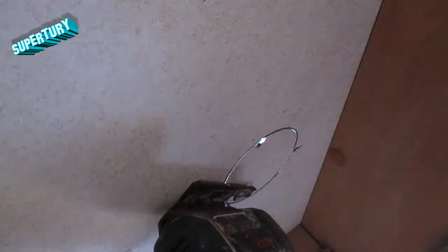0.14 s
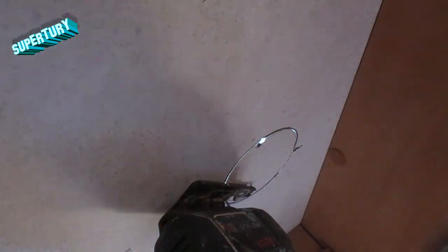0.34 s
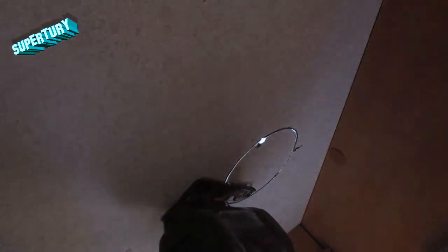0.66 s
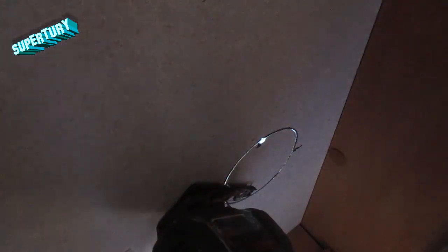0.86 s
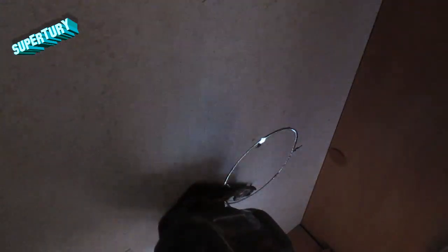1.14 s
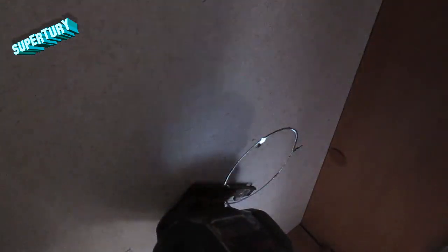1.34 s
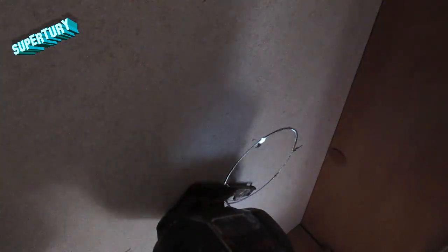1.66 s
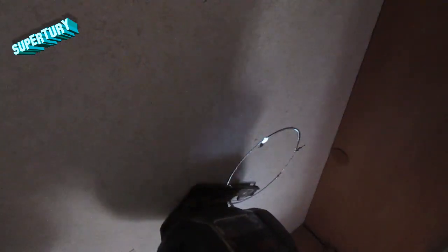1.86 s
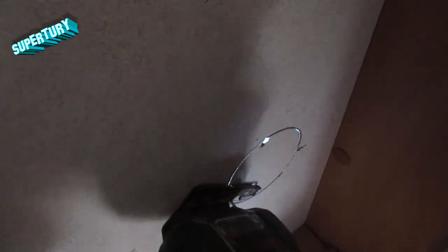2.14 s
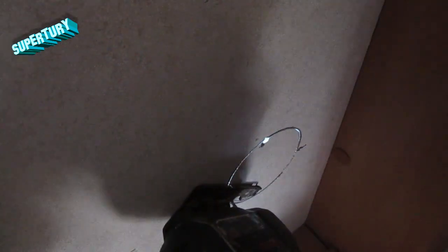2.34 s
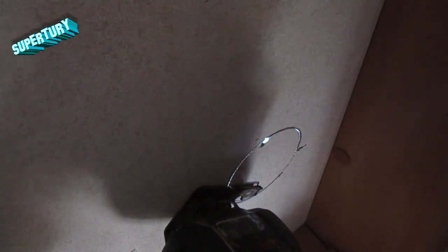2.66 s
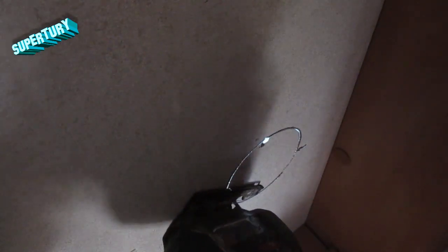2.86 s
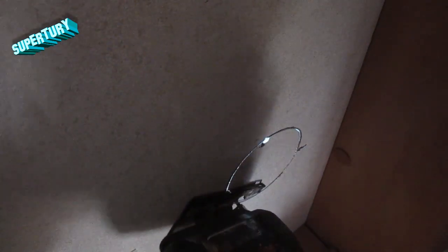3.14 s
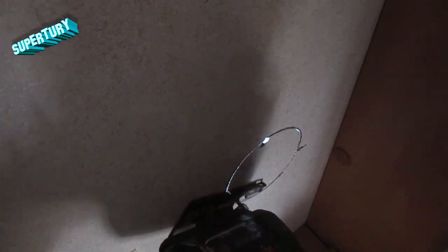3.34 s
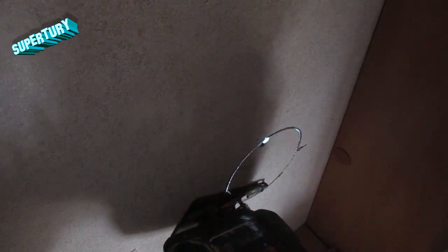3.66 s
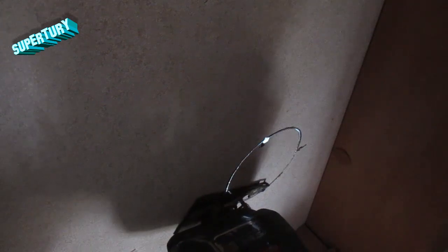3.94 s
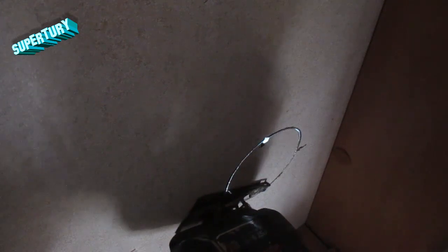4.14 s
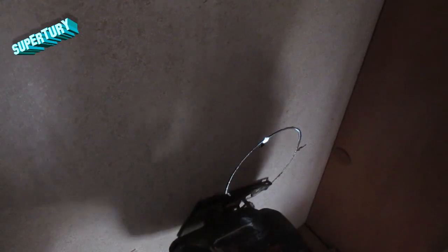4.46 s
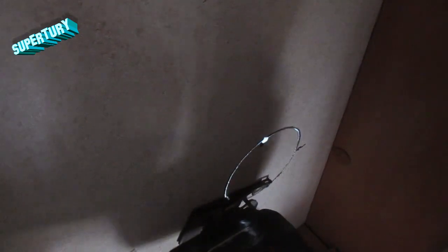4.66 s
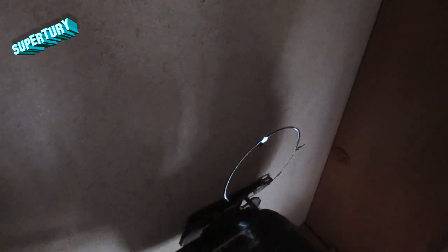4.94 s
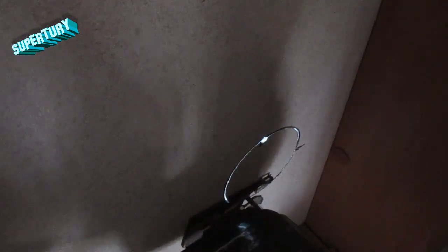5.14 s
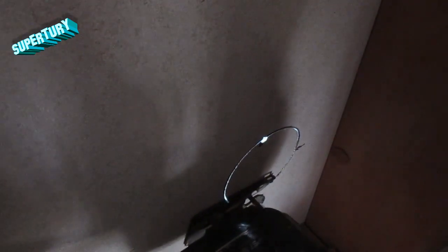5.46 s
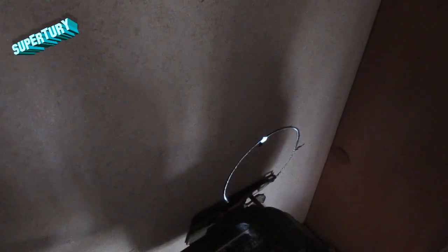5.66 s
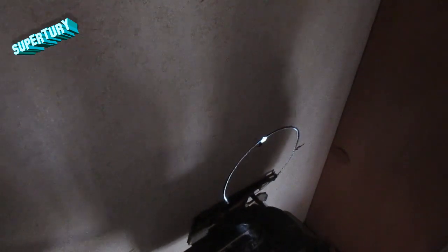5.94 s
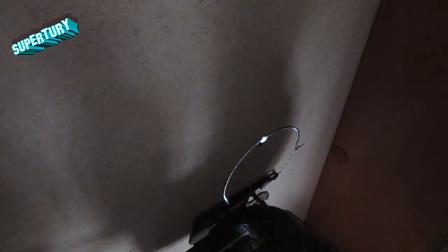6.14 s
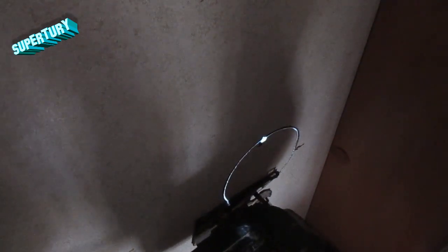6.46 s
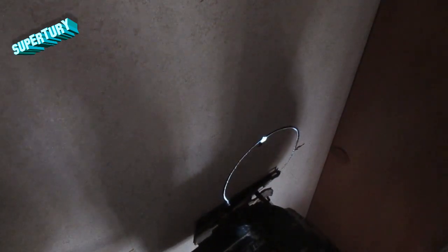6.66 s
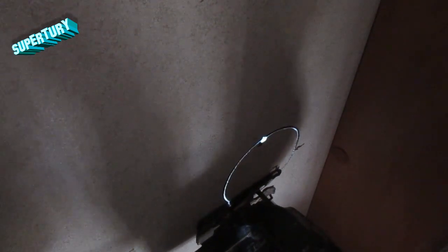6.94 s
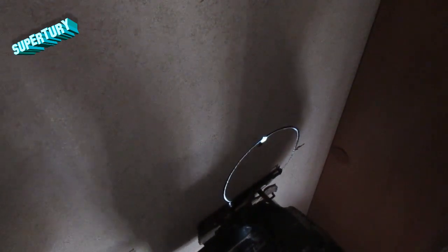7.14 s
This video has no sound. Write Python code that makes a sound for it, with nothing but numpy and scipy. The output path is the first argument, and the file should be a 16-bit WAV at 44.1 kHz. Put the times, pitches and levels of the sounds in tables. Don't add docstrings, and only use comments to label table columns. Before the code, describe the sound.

Close up in a small room, a handheld microphone catches a hand preparing a drill. At 0-0.15 s there is a short creak, a hollow drag of the saw cup and low bumps. Soft skin and cloth rubbing and dull thumps continue, growing around 0.9-1.1 s, with light knocks on the panel from 1 s. Hard clunks and scuffs crowd together at 1.6-1.72 s. At about 1.74 s the trigger is pulled: the saw catches with a heavy, lurching, overloaded growl and climbs in pitch until about 2.7 s. Gear chatter and whine come in, with brief squeals around 2.3-2.8 s. From 3 s the speed holds nearly steady: a loud buzzing drone, rasping teeth and thin steel ringing, pressure wavering, squeals near 3.4, 4.9, 5.2 and 6 s. The tone shifts subtly as the saw sinks, still running at 7.3 s.

```python
import sys
import numpy as np
from scipy import signal
from scipy.fft import rfft, irfft, next_fast_len
from scipy.io import wavfile
from scipy.ndimage import uniform_filter1d, map_coordinates

SR = 44100
rng = np.random.default_rng(int(sys.argv[2]) if len(sys.argv) > 2 else 0)


def how_loud(loudness_db):
    steps = np.asarray(loudness_db, float) / 20
    return 10 ** steps


def put_to_file(sound):
    columns = np.atleast_2d(sound).T
    safe = np.clip(columns, -1, 1)
    whole_steps = np.round(safe * 32767)
    wavfile.write(sys.argv[1], SR, whole_steps.astype(np.int16))


N = 321930
T = np.arange(N) / SR

# time_s, speed_turns_per_s
SHAFT_SPEED = [(1.8, 30.3), (1.89, 33.9), (1.97, 37.0), (2.11, 40.5), (2.32, 44.1), (2.46, 45.2),
               (2.69, 46.6), (2.87, 46.9), (3.36, 46.2), (3.74, 47.1), (4.48, 47.2), (4.73, 46.0),
               (4.95, 45.8), (5.28, 46.1), (5.8, 47.3), (6.49, 47.2), (6.82, 46.7), (7.3, 46.8)]
# time_s, depth_share (0 to 1)
DEPTH = [
    (1.8, 0.03),
    (2.5, 0.13),
    (3.5, .3),
    (4.5, 0.55),
    (5.3, .55),
    (5.7, 0.73),
    (6.6, .9),
    (7.3, 1),
]
# order, surface_db, half_way_db, full_depth_db, gain_db per turn a second of sag
STRONG_ORDERS = [(1, -48.5, -35, -53, -1.5), (2, -24.5, -20, -25.5, -1), (3, -17, -16.5, -18, -0.56),
                 (4, -32, -28.5, -29, -4.5), (5, -21, -14, -10, -1.49), (6, -28, -25, -32, 2),
                 (7, -16, -25, -27, 5), (8, -26, -35, -36.5, 0.1), (9, -41, -52, -52, -5),
                 (10, -29.5, -28, -32.5, -3.5)]
SLOW_DB = [-1.5, -5.5, 2, 7.5, -8, -7, -13, 1, 7, 5.5]
# order, level_db
WEAK_ORDERS = [(11, -32.5), (12, -39), (13, -38), (14, -35.5), (15, -44), (16, -42.5), (22, -42), (27, -40),
               (39, -56.5)]
# time_s, level_db
GEAR_LOAD = [(1.9, -48), (2.15, -36.5), (2.25, -25), (2.5, -24.5), (2.82, -21.5), (3.0, -32.5),
             (3.3, -27.5), (3.45, -23), (4.0, -23), (4.3, -27), (4.62, -31.5), (4.72, -25), (5.3, -23.5),
             (5.72, -23), (5.85, -27), (6.25, -26.5), (6.55, -25), (7.3, -25)]
# peak_s, gain_db, fall_s for 10 dB (the sign is ignored)
SQUEALS = [(2.28, 15, 0.04), (2.41, 16, 0.006), (2.75, 9, -0.03), (3.36, 8.5, -0.17), (3.52, 7, 0.02),
           (4.87, 6.5, 0.16), (5.2, 11, 0.13), (5.36, 7.5, 0.11), (5.5, 4, .05), (5.66, 1, .04),
           (5.98, 8, 0.09)]
# mode_hz, width_hz, level_db over the load, shift_hz at full depth
RING_MODES = [
    (4051, 500, -15, -100),
    (5990, 600, -6.5, -300),
    (8300, 900, -16.5, 0),
]
# time_s, level_db
PRESSURE = [(1.75, -35.5), (1.77, -37.5), (1.9, -30.5), (2.35, -26), (2.38, -22.5), (3.21, -28.5),
            (3.34, -25.5), (4.22, -25), (4.67, -28.5), (5.55, -23.5), (5.83, -26), (5.91, -22.5),
            (6.12, -27.5), (6.26, -23.5), (6.42, -26), (6.94, -24.5), (7.07, -27.5), (7.3, -28.5)]
# frequency_hz, density_db per Hz
GROWL = [(88, -58), (150, -12), (184, -6.5), (237, -12), (374, -12), (488, 0.5), (1900, 0.5), (2470, -80),
         (4180, -120)]
RASP = [(1300, -43), (1800, -1.5), (3200, -2.5), (5000, -3.5), (6500, -8), (8000, -22.5)]
HISS = [(3820, -19.5), (6500, -1), (10300, -10.5), (13600, -25), (15500, -34.5)]
# mode_hz, width_hz, level_db
BOOM = (505, 30, -35.5)
# start_s, peak_db, t60_s
KNOCKS = [(1.013, -20.5, 0.0615), (1.078, -24, 0.119), (1.178, -25.5, 0.087), (1.234, -27, 0.103),
          (1.251, -34, 0.074), (1.342, -34, 0.112), (1.419, -30, 0.149), (1.5, -35, 0.1),
          (1.545, -38.5, 0.16), (1.564, -28.5, 0.074), (1.609, -37, 0.1), (1.631, -12, 0.06),
          (1.677, -16.5, 0.064), (1.713, -15, 0.096)]
# mode_hz, width_hz, level_db
PANEL_MODES = [(288.3, 50, -3), (631, 87.5, 4), (1093, 385, -3), (1467, 148, -3), (2410, 1740, -15)]
CUP_MODES = [(320, 124, 5.5), (1287, 143, 3.5), (2480, 190, -6), (3950, 193, -14.5), (4860, 400, -17.5),
             (6240, 200, -18), (7410, 260, -19)]
# centre_s, peak_db, swing_hz, width_s
BUMPS = [(.056, -23.5, 90, 0.0108), (0.083, -21, 96.6, 0.0124), (.12, -29, 75, 0.057),
         (.3, -24.5, 64.5, 0.0376), (.462, -28.5, 70, .015), (0.498, -30.5, 65.5, .03),
         (.606, -22.5, 85, 0.0069), (.635, -25.5, 70, 0.0104), (0.729, -30, 75, 0.023),
         (.817, -20, 80, 0.013), (0.902, -16, 73.4, 0.031), (1.012, -15.5, 80, 0.0166),
         (1.093, -11.5, 75.7, 0.0293), (1.18, -31.5, 94, 0.017), (1.265, -27.5, 110, 0.0108),
         (1.367, -28, 93, 0.0264), (1.428, -28, 101, 0.015), (1.55, -26.5, 75, 0.0336),
         (1.616, -5.5, 98, 0.0107), (1.638, 4, 99.5, 0.01185), (1.674, -4, 106, 0.009),
         (1.721, 1.5, 85, 0.0176)]
# peak_s, middle_db, brightness_db per band, fall_s for 10 dB
STROKES = [(.06, -57, -9, 0.16), (.33, -52.5, -4, .08), (.45, -46.5, -1.5, 0.0367), (.562, -46, 10, .02),
           (.595, -43, 10, .03), (.7, -52, -7, 0.14), (.836, -49.5, -8.5, 0.0741), (.94, -44, -1, 0.0755),
           (1.07, -44.5, -6, 0.0982), (1.19, -46.5, -4, 0.0031), (1.255, -44.5, -10.5, 0.0177),
           (1.35, -51.5, -3, 0.0672), (1.43, -45.5, -12, 0.02), (1.565, -46.5, -4, 0.02),
           (1.621, -34, -5.5, 0.0077), (1.646, -25.5, -12.5, 0.021), (1.688, -20.5, -3.5, 0.0119),
           (1.718, -16.5, -4.5, 0.0191)]
# frequency_hz, level_db
SKIN_LOW = [(110, 1), (220, 2.5), (450, -1.5), (650, -20)]
SKIN_MIDDLE = [(400, -8), (550, -1.5), (1300, -9.5), (2100, -16), (2800, -17)]
SKIN_HIGH = [(1000, -26.5), (2100, -1), (5000, -3.5), (9000, -8), (15000, -23)]
# peak_s, level_db, pitch_hz, glide_hz_per_s, fall_s for 10 dB
CREAK = (.032, -38, 350, -5500, .02)
# time_s, level_db
TREMBLE_LEVEL = [(0.0, -46.5), (0.14, -47), (0.5, -37.5), (0.73, -42), (1, -36.5), (1.2, -44.5),
                 (1.49, -45), (1.6, -38.5)]
# frequency_hz, level_db
TREMBLE = [(20, -29.5), (40, 0), (70, -9), (110, -9.5), (200, -31.5)]

START_S = 1.74
FREE_TURNS, MOST_SAG = 47.3, 1.21


def unit(x):
    return x / np.sqrt(np.mean(x ** 2) + 1e-20)


def curves(rows, before=-120):
    time_s, *columns = np.transpose(rows)
    return [np.interp(T, time_s, column, before, column[-1]) for column in columns]


def depth_curve():
    return curves(DEPTH, before=None)[0]


def wobble(rate):
    return map_coordinates(rng.standard_normal(int(N * rate / SR) + 4), [T * rate])


def filtered(x, response):
    m = next_fast_len(N + SR)
    return irfft(rfft(x, m) * response(np.fft.rfftfreq(m, 1 / SR) + 1e-3), m)[:N]


def coloured(x, points):
    hz, db = np.transpose([(points[0][0] / 2, -120), *points, (points[-1][0] * 2, -120)])
    return unit(filtered(x, lambda f: how_loud(np.interp(np.log(f), np.log(hz), db))))


def resonances(modes):
    def response(f):
        return sum((-1) ** k * how_loud(db) * 1j * f * width / (centre ** 2 - f ** 2 + 1j * f * width)
                   for k, (centre, width, db) in enumerate(modes))
    return response


def peak(s, rise_s, fall_s):
    return -10 * np.where(T < s, (s - T) / abs(rise_s), (T - s) / abs(fall_s))


def since_start(fade_s):
    return np.exp(-np.maximum(T - START_S, 0) / abs(fade_s))


def shaft(turns):
    lurch_db = 9 * since_start(0.205)
    drive_db = 1.283 + lurch_db + peak(START_S, 0.0055, np.inf)
    depth = depth_curve()
    sag = np.clip(FREE_TURNS - np.gradient(turns) * SR, 0, MOST_SAG)
    running = np.clip((T - 2) / 1.0, 0, 1)

    levels = {}
    for (order, *depth_db, sag_gain), slow_db in zip(STRONG_ORDERS, SLOW_DB):
        sunk_db = np.interp(depth, [0, .5, 1], depth_db)
        levels[round(order)] = sunk_db + sag_gain * sag * running + slow_db * since_start(0.283) + drive_db
    for order, db in WEAK_ORDERS:
        levels[order] = db - 2.2 * sag + 1.41 * wobble(1.437) + 20 * np.log10(running + 1e-6)

    lag = wobble(1.22)
    shaking = np.zeros(N)
    for order, db in levels.items():
        drift = 0.0828 * order * lag + 0.0214 * order * wobble(1.097) + 0.07 * np.sqrt(order) * wobble(30)
        drift = drift + np.pi * (order in (6, 9, 13, 15))
        flutter_db = 0.331 * wobble(14) + 0.674 * wobble(4)
        shaking -= np.sqrt(2) * how_loud(db + flutter_db) * np.cos(2 * np.pi * order * turns + drift)
    return shaking


def gears(turns):
    centre_hz = 2066.5 + 128.7 * depth_curve() ** 3 + 15 * wobble(5)
    level_db = curves(GEAR_LOAD)[0] + 2 * wobble(12)
    speed = np.maximum(np.gradient(turns) * SR, 1)
    mesh = 0
    for order in range(35, 53, 2):
        near = 1 / np.sqrt(1 + ((order * speed - centre_hz) / 75) ** 4)
        drift = 1.0 * wobble(1.4745) + .5 * wobble(35) + 0.392 * wobble(200)
        mesh += near * how_loud(1.02 * wobble(3.064)) * np.cos(2 * np.pi * order * turns + drift)
    mesh *= 1 + 0.387 * np.cos(2 * np.pi * turns + 2.96 * wobble(0.962))
    envelope = np.sqrt(np.abs(uniform_filter1d(mesh ** 2, size=4410)) + 1e-6)
    even_mesh = mesh / envelope

    squeal = 1 + sum(how_loud(db + peak(s, fall_s, fall_s)) for s, db, fall_s in SQUEALS)
    overtone = unit(filtered(even_mesh ** 2, lambda f: f > 3000))
    return how_loud(level_db - 0.1) * (even_mesh + how_loud(-14.5) * squeal * overtone)


def ring(turns):
    struck = how_loud(1 * np.cos(4 * np.pi * turns - 2.2))
    loads = curves(GEAR_LOAD) + 2 * curves(PRESSURE)
    depth = depth_curve()
    running = np.clip((T - 1.9) / 0.55, 0, 1)
    ringing = np.zeros(N)
    for load_db, (hz, width_hz, db, shift_hz) in zip(loads, RING_MODES):
        pitch_hz = (hz + shift_hz * depth) * (1 + .012 * wobble(3))
        swell = how_loud(1.82 * wobble(40) + 1.7 * wobble(5))
        tone = np.cos(2 * np.pi * np.cumsum(pitch_hz) / SR)
        ringing += how_loud(load_db + db) * unit(struck * swell * wobble(width_hz) * tone)
    return running * ringing


def teeth(turns, repeat):
    pattern = uniform_filter1d(rng.standard_normal((int(turns[-1]) + 3, 512)), size=11, axis=0)
    same = unit(map_coordinates(pattern, [turns, turns % 1 * 511], order=1))
    share = np.clip(repeat, 0, 1)
    return np.sqrt(share) * same + np.sqrt(1 - share) * rng.standard_normal(N)


def saw(turns):
    press_db = curves(PRESSURE)[0]
    usual_db = np.median(press_db)
    catch_db = 5 * since_start(.1) * np.cos(2 * np.pi * turns - 1.5)
    chips_db = 0.914 * wobble(60) + 0.99 * wobble(400) + 0.37 * wobble(6)
    bite = unit(how_loud(0.38 * np.cos(4 * np.pi * turns - 2.5) + chips_db))

    growl_level = (T > START_S) * how_loud(-26 + 0.276 * np.maximum(press_db - usual_db, -15))
    rasp_level = how_loud(press_db + catch_db + 1.5)
    hiss_level = how_loud(usual_db + 0.747 * (press_db - usual_db) + catch_db - 4)
    growl = growl_level * coloured(bite * teeth(turns, repeat=0.259 * (1 - since_start(0.45))), GROWL)
    rasp = rasp_level * coloured(bite * teeth(turns, repeat=0.416), RASP)
    hiss = hiss_level * coloured(bite * rng.standard_normal(N), HISS)

    boom_hz, boom_width_hz, boom_db = BOOM
    boom_tone = unit(wobble(boom_width_hz) * np.cos(2 * np.pi * boom_hz * T))
    boom = how_loud(boom_db) * np.clip(T - 2.3, 0, 1) * boom_tone
    return boom + growl + rasp + hiss


def knocks():
    scrape = np.zeros(N)
    t = np.arange(SR // 5) / SR
    for s, db, t60 in KNOCKS:
        blow = rng.standard_normal(len(t)) + 1.0 * (t < .0015)
        envelope = how_loud(db + 14.5 - 60 * t / abs(t60)) * (1 - np.exp(-t / 0.00083))
        scrape[round(s * SR):][:len(t)] += envelope * blow
    panel = resonances(PANEL_MODES)
    return filtered(scrape, lambda f: panel(f) / (1 + 1j * f / 2500) ** 2)


def drag():
    level = (T < .16) * how_loud(-36.5 + peak(0.07, rise_s=0.073, fall_s=0.0403))
    return level * unit(filtered(rng.standard_normal(N), resonances(CUP_MODES)))


def bumps():
    swings = np.zeros(N)
    for s, db, hz, width in BUMPS:
        burst = how_loud(db) * np.exp(-2.8 * ((T - s) / width) ** 2)
        swings += burst * np.cos(2 * np.pi * hz * (T - s) + rng.uniform(0, 2 * np.pi))
    return swings


def creak():
    s, db, hz, glide, fall_s = CREAK
    return how_loud(db + peak(s, fall_s, fall_s)) * np.cos(2 * np.pi * (hz + glide * (T - s) / 2) * (T - s))


def idle():
    return np.clip((1.76 - T) / .02, 0, 1)


def rub():
    rubbing = np.zeros(N)
    for band, skin in zip((-1, 0, 1), (SKIN_LOW, SKIN_MIDDLE, SKIN_HIGH)):
        level = np.clip(T / 0.38, 0, 1) * how_loud(-62 - 7 * band)
        for s, db, bright_db, fall_s in STROKES:
            loss_db = 10 * (-peak(s, 1.019 * fall_s, fall_s) / 10) ** 1.53
            level = level + how_loud(db + band * bright_db - loss_db)
        grain = rng.standard_normal(N) * how_loud(1.9 * wobble(150))
        rubbing += level * coloured(grain, skin)
    return idle() * how_loud(-0.5) * rubbing


def tremble():
    level = how_loud(curves(TREMBLE_LEVEL)[0] + 6.5 + 1.44 * wobble(10))
    return (0.535 + 0.31 * idle()) * level * coloured(rng.standard_normal(N), TREMBLE)


def scene():
    turns = np.cumsum(curves(SHAFT_SPEED, before=None)[0]) / SR
    drill = shaft(turns) + gears(turns) + ring(turns) + saw(turns)
    hand = bumps() + creak() + rub() + tremble()
    return (drill + knocks() + drag() + hand)[None]


def top_cut(x):
    return signal.sosfilt(signal.butter(12, 15630, fs=SR, output="sos"), x)


def record(dry, coupling_hz=90, leak_hz=15, rumble_hz=32):
    def coupling(f):
        return (leak_hz + 1j * f) / (coupling_hz + 1j * f)

    capsule = filtered(dry[0], lambda f: 1 / coupling(f))
    duck_db = -5 * since_start(0.51)
    spare_db = 11.5 * np.clip(1 - (T - START_S) / 0.028, 0, 1)
    ceiling = how_loud(-6 + duck_db + spare_db) * np.where(capsule < 0, .9, 1.3)
    held = capsule / (1 + np.abs(capsule / ceiling) ** 8) ** (1 / 8)
    out = filtered(held, lambda f: coupling(f) / np.sqrt(1 + (rumble_hz / f) ** 4))
    return top_cut(np.clip(out, -1, 1)[None])


dry = scene()
out = record(dry)
put_to_file(out)
```